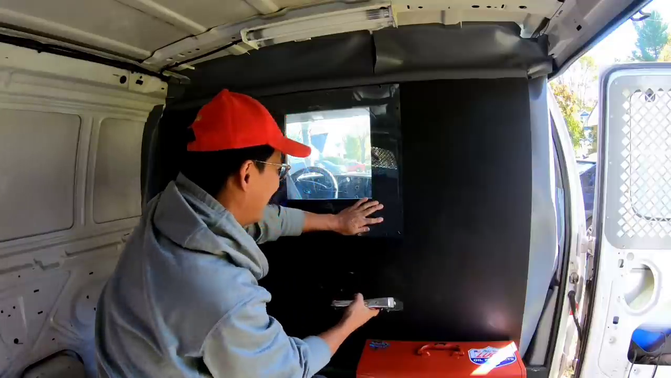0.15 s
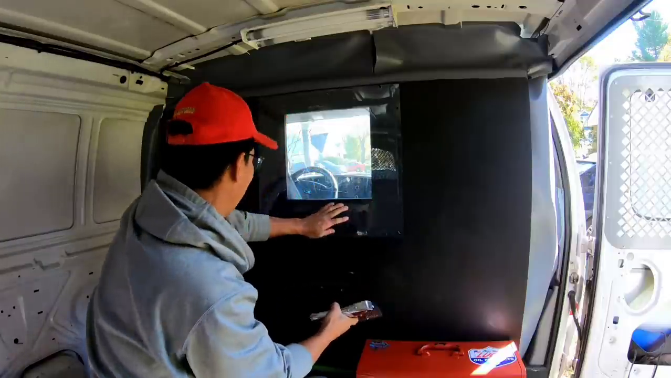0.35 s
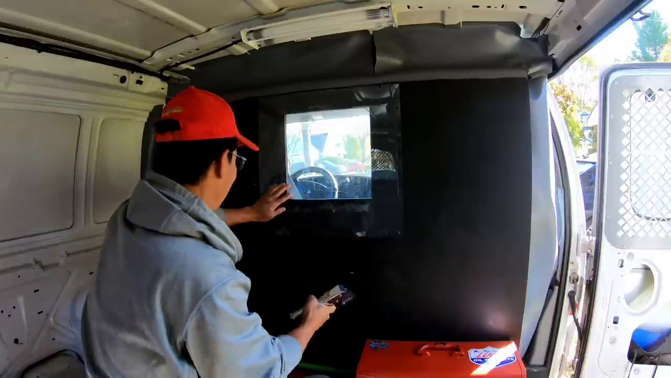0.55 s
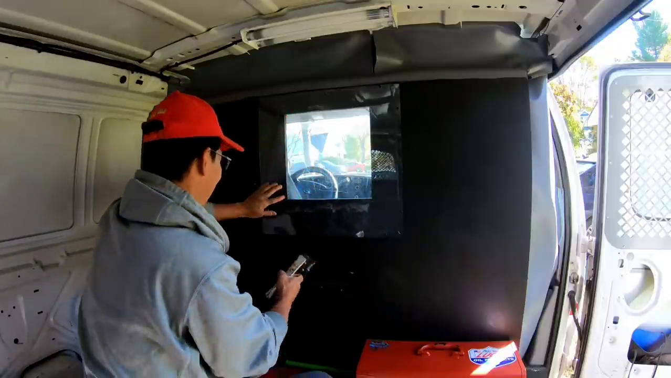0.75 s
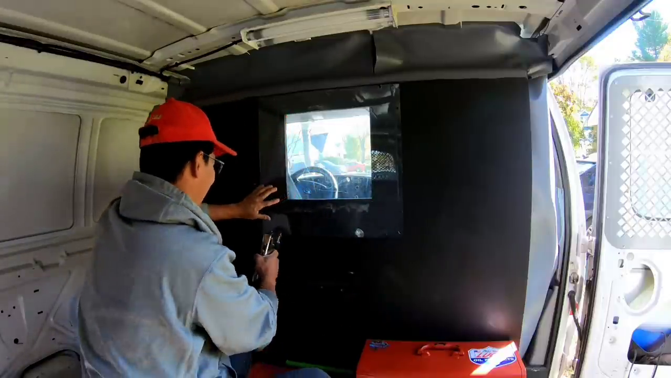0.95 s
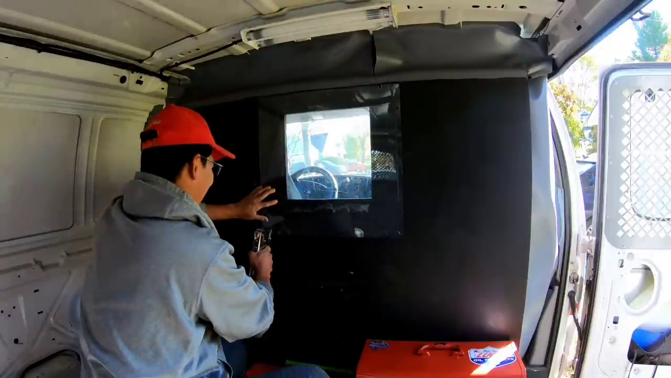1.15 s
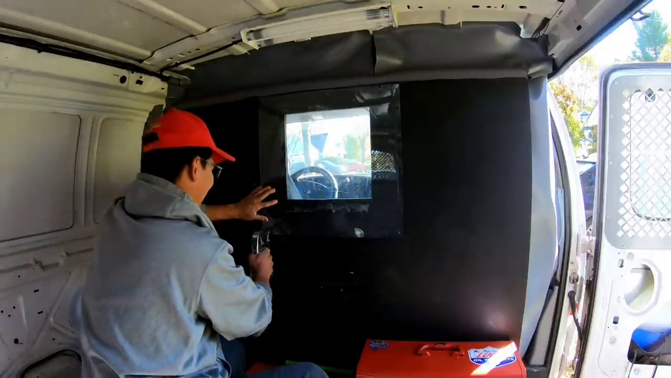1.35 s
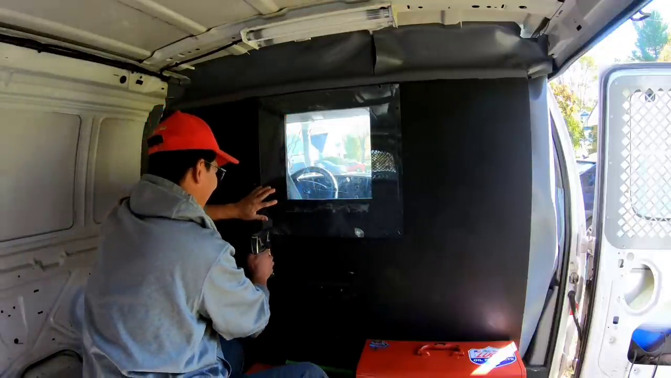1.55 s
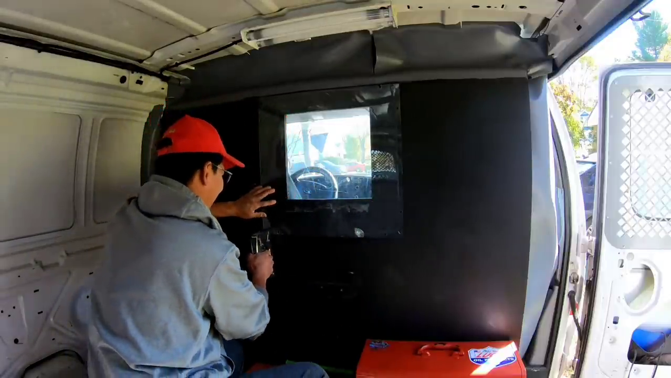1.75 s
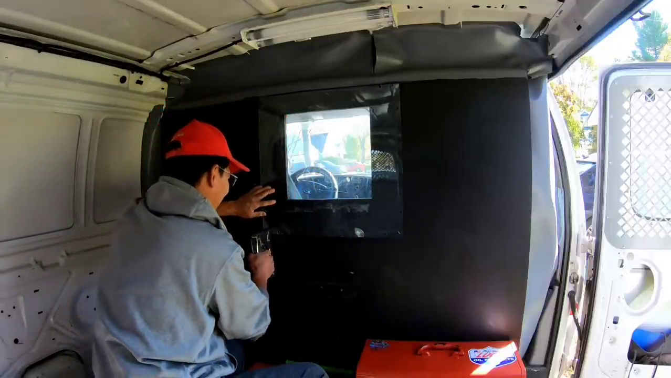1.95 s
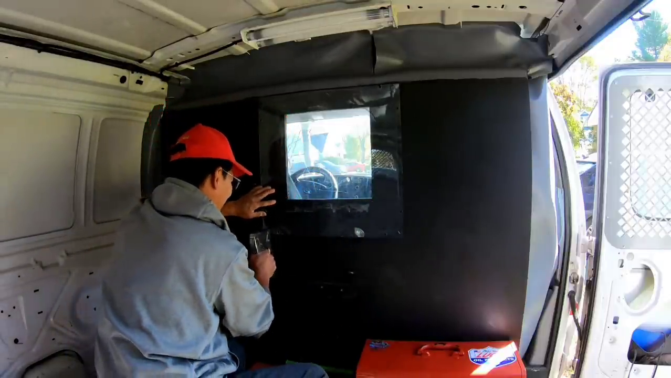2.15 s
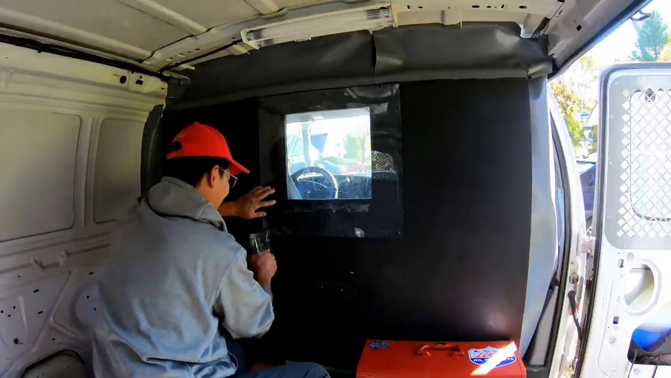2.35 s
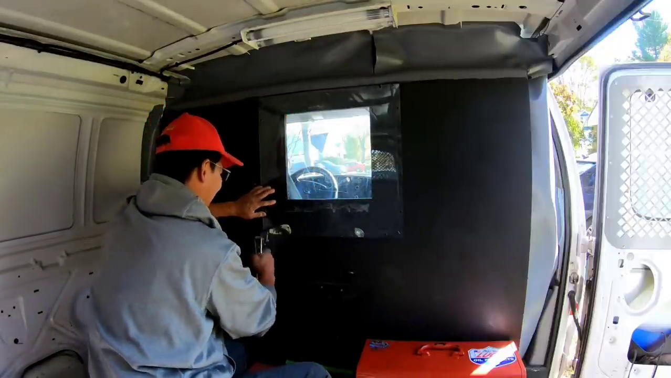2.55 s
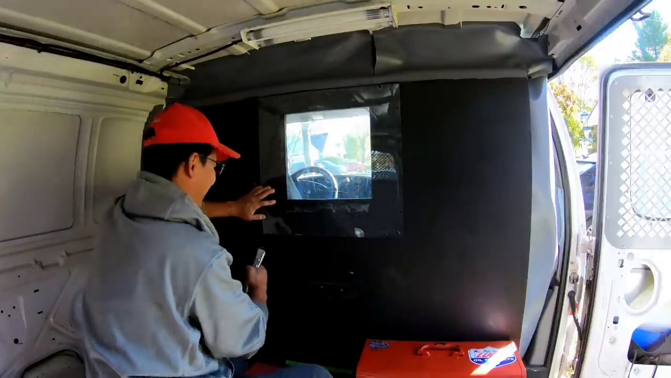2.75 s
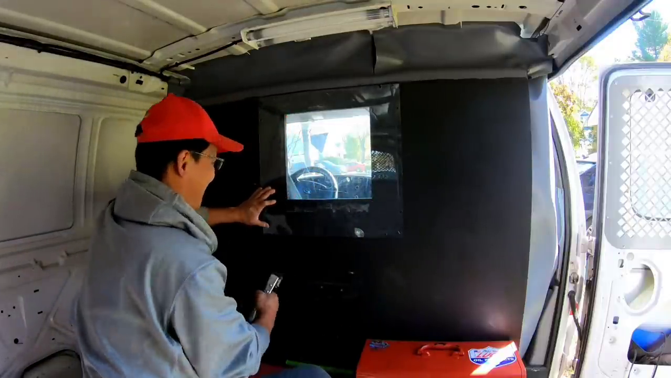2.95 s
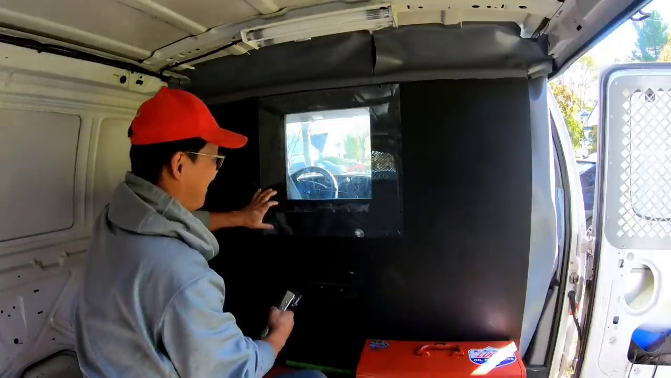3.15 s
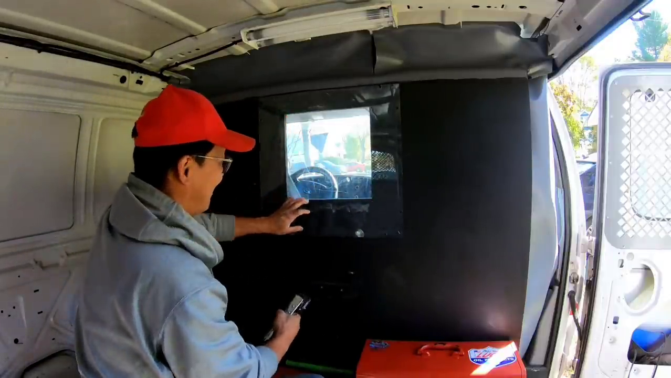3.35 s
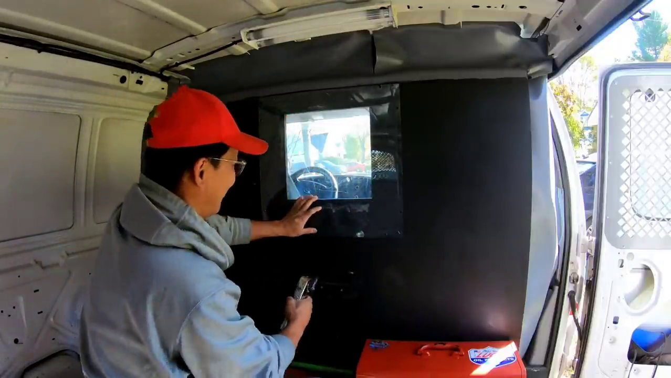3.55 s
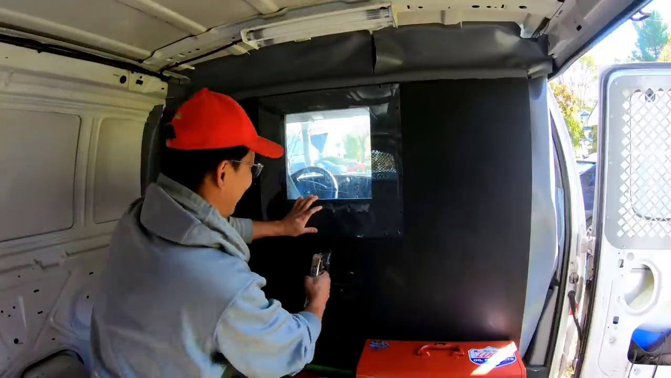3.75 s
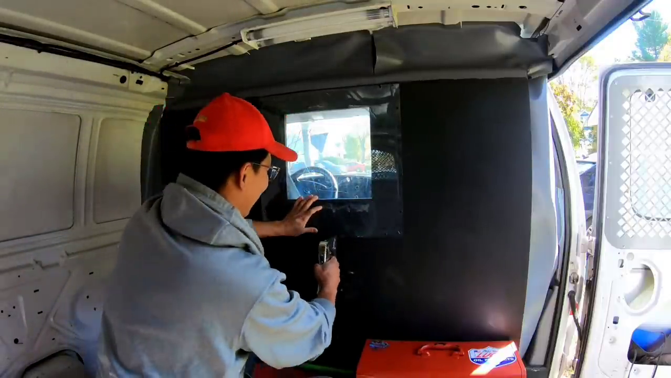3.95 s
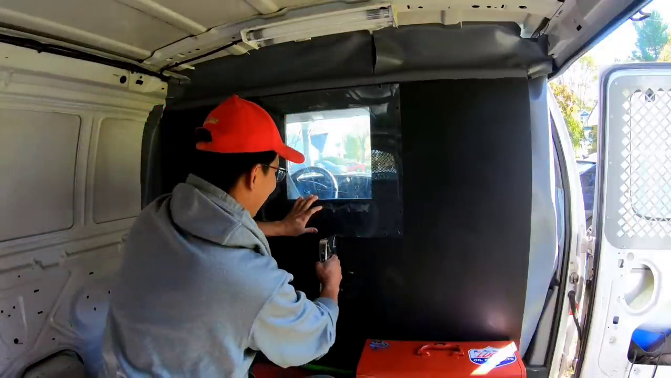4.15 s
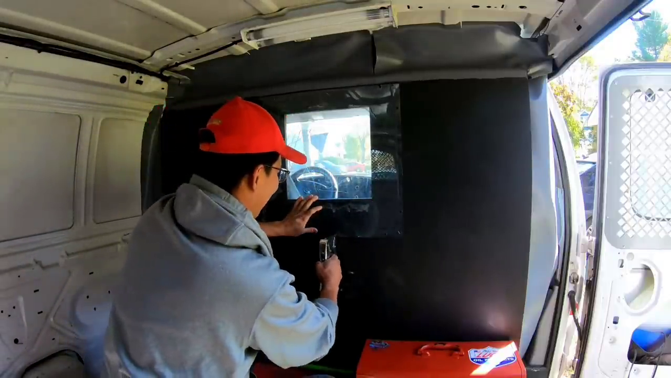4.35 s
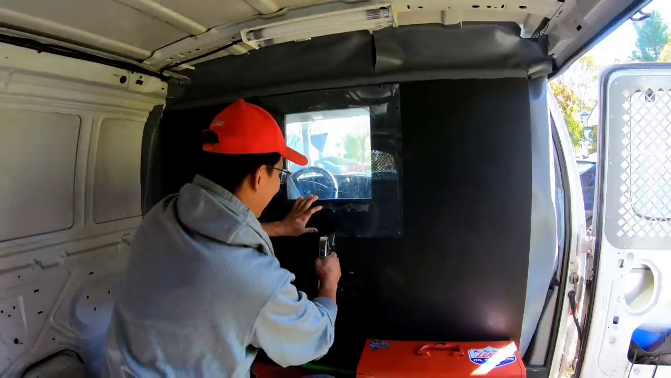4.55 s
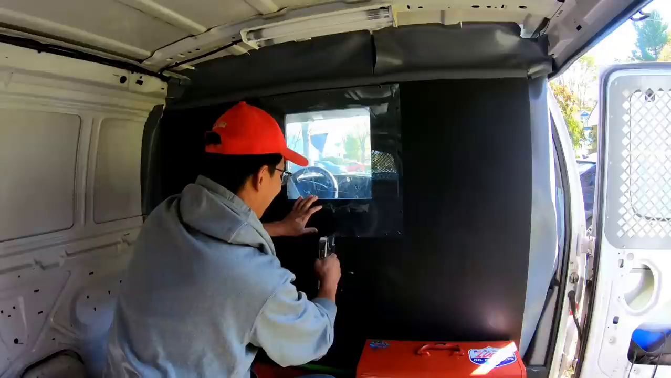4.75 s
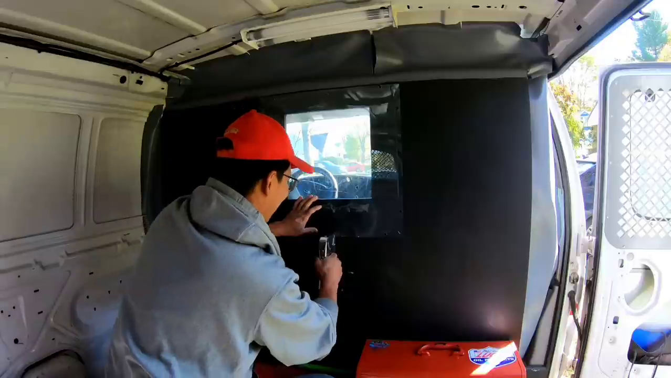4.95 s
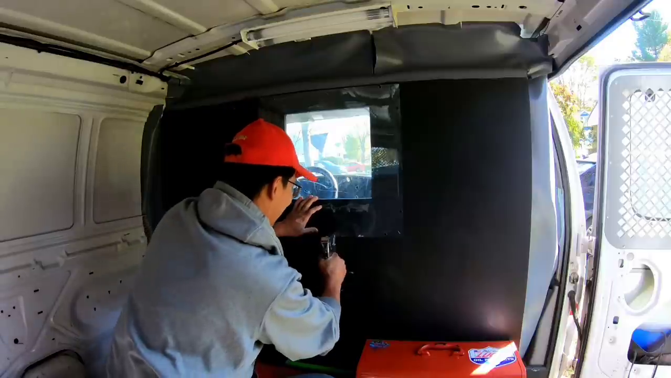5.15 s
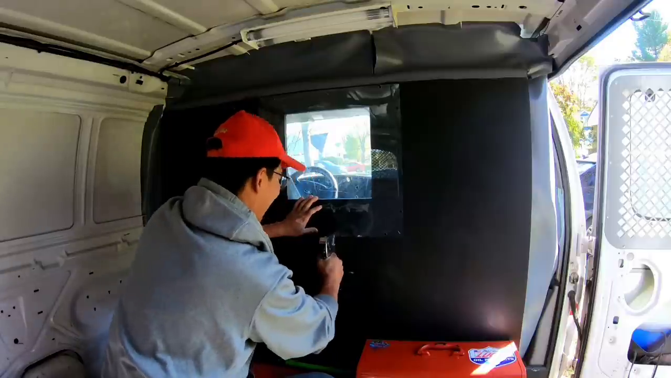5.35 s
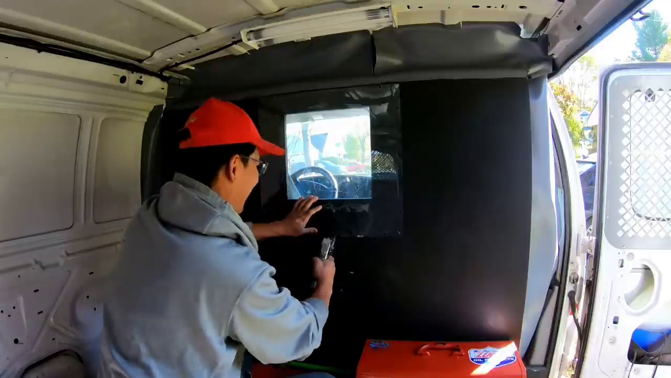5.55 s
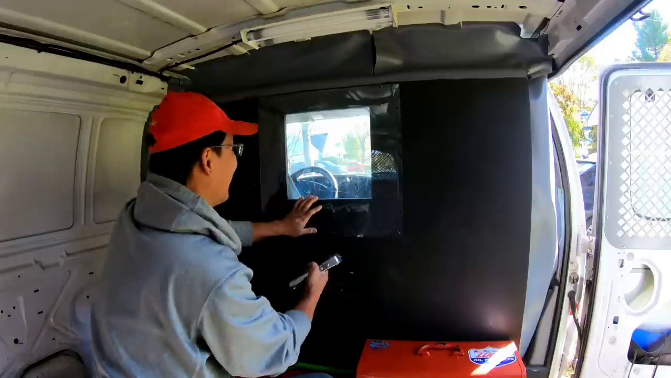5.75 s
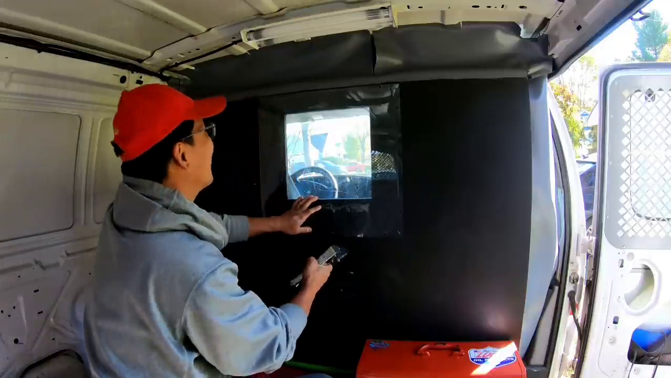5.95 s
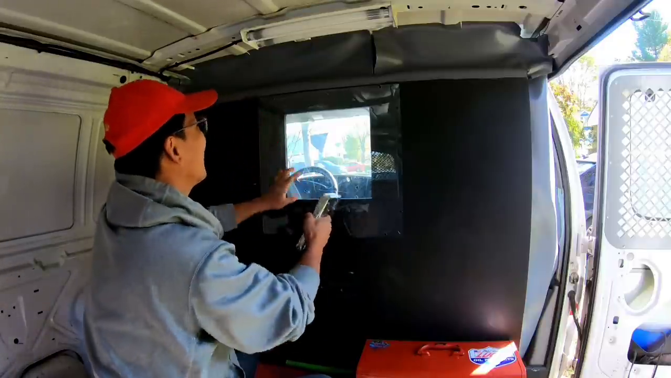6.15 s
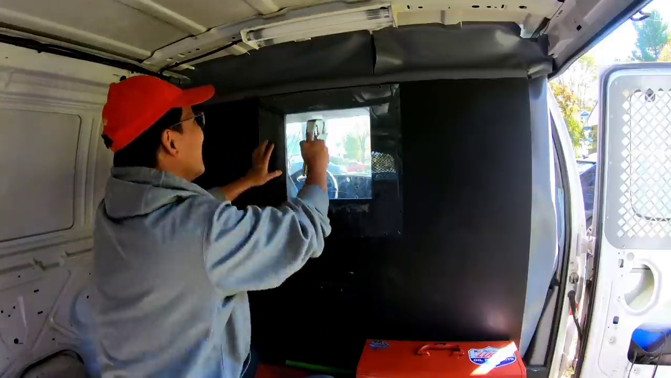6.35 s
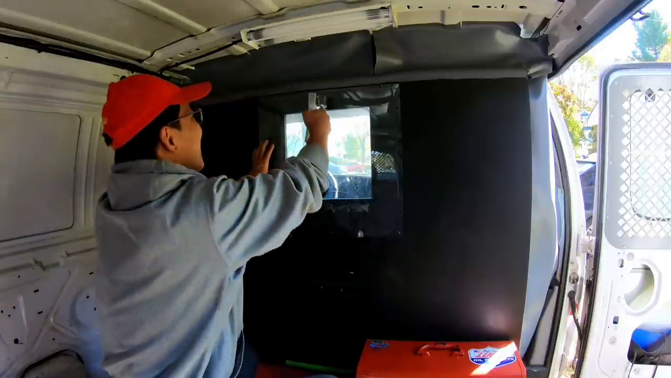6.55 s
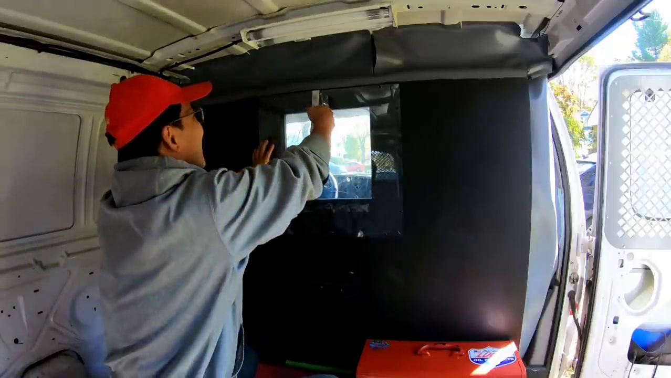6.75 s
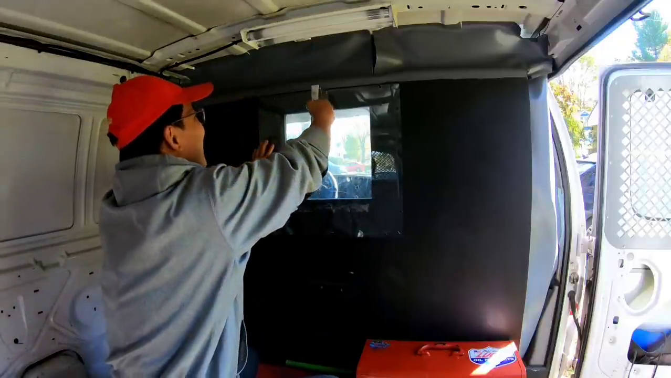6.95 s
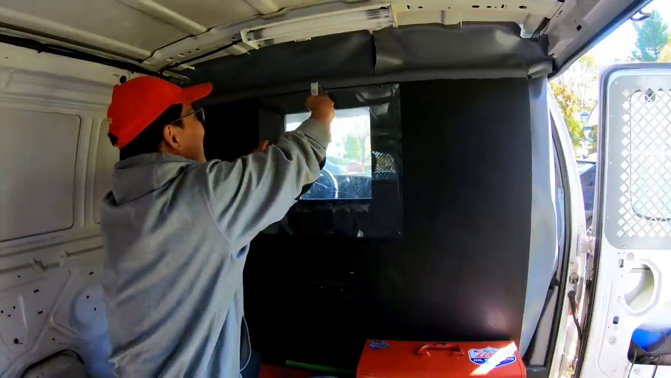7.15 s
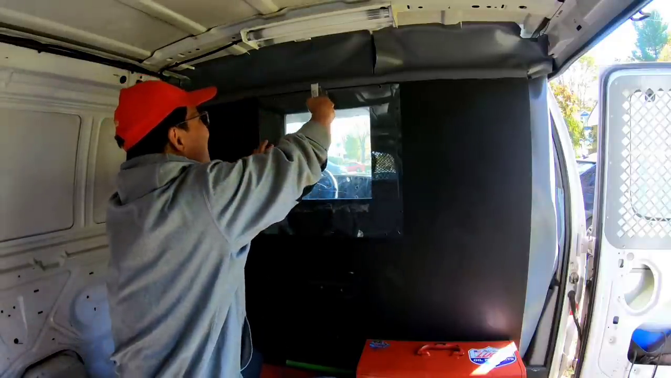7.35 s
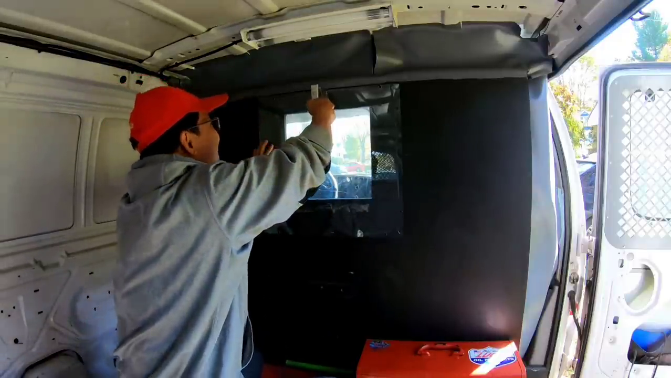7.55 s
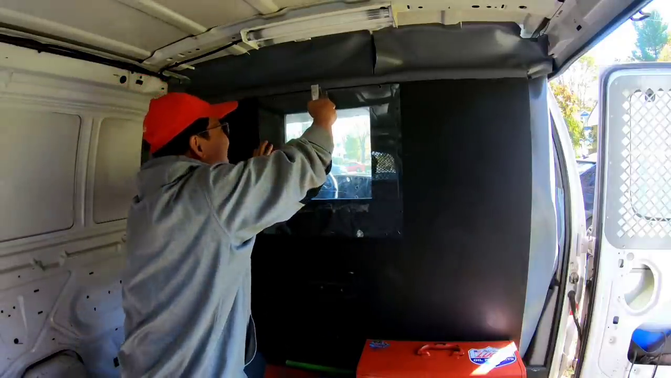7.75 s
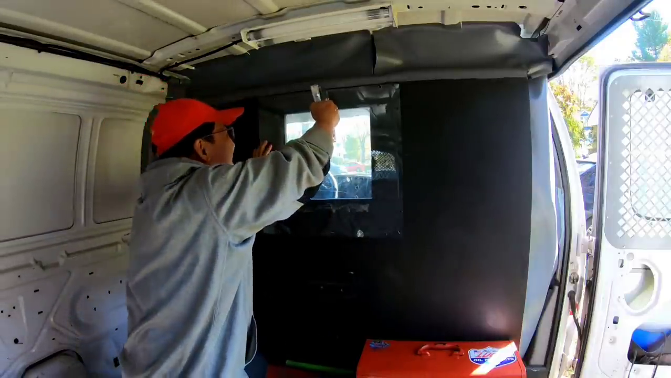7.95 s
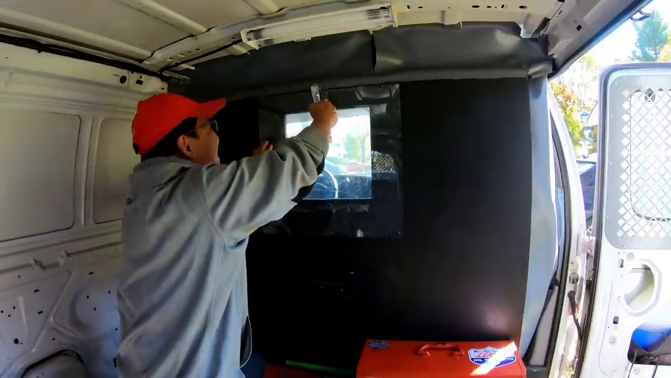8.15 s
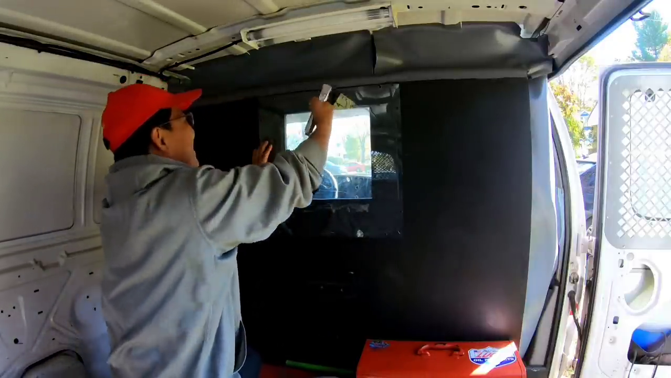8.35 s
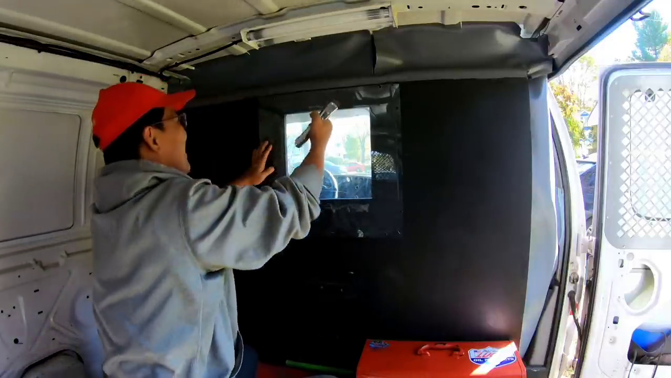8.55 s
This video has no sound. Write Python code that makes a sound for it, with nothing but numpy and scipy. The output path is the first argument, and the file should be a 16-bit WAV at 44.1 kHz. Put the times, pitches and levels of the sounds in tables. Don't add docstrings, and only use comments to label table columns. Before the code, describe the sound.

Inside a metal van, a hand stapler snaps three widely spaced times into a plywood wall, with booming panels, small rattles and low engine hum.

```python
import sys
import numpy as np
from scipy import signal
from scipy.fft import rfft, irfft, next_fast_len
from scipy.io import wavfile
from scipy.ndimage import uniform_filter1d

SR = 44100
rng = np.random.default_rng(int(sys.argv[2]) if len(sys.argv) > 2 else 0)


def magnitude_from_level(level_db):
    exponent = np.asarray(level_db, float) / 20
    return 10 ** exponent


def generate_wav(sig):
    pcm = np.round(np.clip(np.atleast_2d(sig).T, -1, 1) * 32767).astype(np.int16)
    wavfile.write(sys.argv[1], SR, pcm)


N = 383229

# t/s, peak/dB, ring f/Hz, bare crack/dB
SHOTS = [
    (2.2253, -7, 2800, 10),
    (2.2278, -10, 2800, 11),
    (5.2172, -16, 1700, 8),
    (5.2195, -8, 2500, 11),
    (7.9848, -4.5, 2420, 8),
    (7.9865, -13, 4000, 8),
]
# t/s, peak/dB, ring f/Hz, plywood/dB
LATCHES = [
    (2.199, -8.5, 4300, -9),
    (5.1893, -9, 3630, -13),
    (7.939, -11, 3232, -22),
]
# t/s, peak/dB, ring f/Hz, sizzle/dB, plywood/dB
TICKS = [(0.584, -52, 1270, -41, -16.5), (1.3442, -38, 4130, -26, -20.5), (1.466, -39, 3000, -15.5, -21.5),
         (2.6705, -20, 2600, -4.5, -16), (2.825, -41, 1500, -15, -27), (2.9519, -45.5, 1404, -14, -12),
         (3.031, -39.5, 4007, -4.5, -25.5), (3.5621, -43.5, 1660, -37, -12), (5.5579, -35, 4750, -10, -13),
         (5.6238, -42, 2598, -29, -37), (5.7025, -31, 3030, -6.5, -18), (5.7075, -18.5, 1780, -12, -31),
         (5.7207, -25.5, 1763, 0.5, -23.5), (6.8137, -29.5, 2490, -29.5, -14),
         (6.956, -35.5, 2100, -16, -26), (8.4038, -21, 6170, -10.5, -19.5),
         (8.4139, -28, 2300, -9.5, -15.5)]
# t/s, peak/dB, ring f/Hz, sizzle/dB, plywood/dB
KNOCKS = [(1.5545, -26.5, 1550, -33, 1), (1.726, -45.5, 2800, -21, -5), (1.75, -48, 3300, -28, 0),
          (2.4925, -32.5, 2400, -34, -3), (2.6191, -52, 1680, -24.5, 6), (2.6324, -33, 2600, -28, 1),
          (3.5403, -53, 1630, -41, -8.5), (4.077, -37, 1384, -24.5, 3), (4.9273, -38.5, 2370, -24, -8),
          (6.3639, -53, 1795, -28, -5.5), (6.858, -33, 1500, -35, -3), (7.4178, -47.5, 2306, -36.5, -6),
          (8.2713, -44, 1430, -30.5, 1), (8.307, -42, 1755, -26.5, 4.5)]
# start/s, end/s, level/dB, sizzle/dB, plywood/dB
SLIDES = [(2.026, 2.065, -65.5, -6, -7), (2.185, 2.204, -40.5, -17, -8.5), (5.167, 5.191, -44, -10.5, -4),
          (7.932, 7.94, -52, -15, -20), (2.2, 2.223, -31, -7, 4.5), (2.495, 2.523, -52, -11, 4),
          (2.615, 2.672, -42.5, -9, -11), (3.032, 3.055, -63, -12.5, -21.5), (4.076, 4.087, -63, -7, -5),
          (5.191, 5.221, -25, -12, -6), (5.686, 5.701, -47.5, -6, -21.5), (6.826, 6.869, -55.5, -17.5, -19),
          (7.954, 7.985, -30.5, -7.5, 0.5), (8.313, 8.353, -58.5, -13, -13.5),
          (8.38, 8.405, -47, -4, -11.5)]
# f/Hz, width/Hz, level/dB
HOUSING = [(1740, 200, -15), (2830, 400, -14), (3540, 84, -20.5), (4060, 84, -26), (5000, 140, -12.5),
           (6400, 400, -5), (7572, 700, 1), (11200, 700, -3)]
# f/Hz, level/dB, time to fall 60 dB/s
SPRING = [(1165, -52, .4), (1330, -54, .35), (1695, -55, .4), (2185, -54, .4), (2385, -61, .35),
          (2600, -62, .6), (2800, -62, .4), (3300, -60, .45), (4010, -56, .3), (6250, -56, .25)]
# t/s, f/Hz, peak/dB, time to fall 60 dB/s, swell/s
CHIMES = [(1.3445, 4200, -45, .06, .001), (1.3445, 1850, -47, .06, .001), (1.468, 1250, -52, .15, .003),
          (2.2262, 2810, -12, .04, .001), (2.2262, 1650, -15, .05, .001), (2.2262, 3650, -17, .03, .001),
          (2.236, 2645, -25, .15, .004), (2.24, 1190, -27, .25, .01), (2.495, 1693, -39, .1, .002),
          (2.496, 1125, -38, .12, .003), (2.51, 2392, -46, .25, .01), (2.36, 2480, -56, .9, .03),
          (2.671, 3310, -40, .12, .002), (2.672, 11150, -36, .08, .002), (5.708, 11200, -46, .2, .003),
          (5.71, 6100, -42, .06, .002), (2.671, 6817, -43, .1, .001), (2.672, 1265, -43, .2, .003),
          (2.68, 2115, -45, .2, .004), (5.19, 3601, -27, .04, .001), (5.195, 2191, -29, .1, .004),
          (5.19, 4602, -30, .07, .001), (5.219, 2800, -12, .03, .001), (5.219, 1790, -15, .03, .001),
          (5.235, 2600, -35, .3, .01), (5.708, 1324, -43, .22, .01), (5.708, 1760, -42, .15, .003),
          (6.814, 2610, -43, .1, .002), (7.9395, 3146, -25, .1, .001), (7.945, 1983, -34, .15, .004),
          (7.985, 2300, -10, .018, .0004), (7.985, 2980, -13, .018, .0004), (7.995, 1168, -29, .15, .004),
          (7.995, 3523, -32, .15, .003), (8.05, 2487, -40, .25, .01), (8.405, 2357, -41, .2, .006),
          (8.405, 6204, -42, .12, .002), (8.405, 1500, -46, .2, .004)]
# t/s, f/Hz, peak/dB, time to fall 60 dB/s, swell/s
BOARDS = [(2.2, 800, -26, .06, .002), (2.24, 851, -30, .28, .01), (2.505, 192, -21, .3, .015),
          (2.515, 815, -42, .2, .005), (2.672, 500, -38, .1, .003), (5.19, 190, -28, .2, .01),
          (5.222, 862, -23, .3, .012), (5.24, 120, -17, .45, .03), (5.23, 300, -26, .2, .015),
          (6.818, 240, -36, .2, .01), (6.82, 480, -42, .15, .006), (7.992, 205, -12, .14, .004),
          (7.99, 520, -20, .15, .004), (6.855, 600, -36, .15, .004), (4.078, 700, -42, .15, .003),
          (7.985, 330, -18, .08, .002), (7.985, 130, -30, .15, .004), (8.1, 427, -34, .5, .03),
          (8.3, 480, -44, .3, .02), (8.3, 340, -38, .5, .03), (1.557, 620, -30, .1, .002),
          (1.557, 474, -30, .12, .003), (1.76, 250, -36, .2, .006)]
# f/Hz, time to fall 60 dB/s
CABIN_T60 = [(300, 0.2), (800, .27), (2000, .22), (5000, .25), (10000, .26), (13000, 0.225), (16000, .15)]
# t/s, peak/dB, panel f/Hz, sway/dB, ring share (times the panel's own ring)
THUDS = [(0.689, -37.5, 123, -8.5, 0.355), (0.803, -43, 105, -2, 1), (1.379, -37, 119.7, -2.5, 0.71),
         (1.432, -28, 115, 14, 0.47), (1.556, -17, 131.4, -12, 0.4), (1.615, -32, 127.2, -24, 0.65),
         (1.752, -25, 174.2, -19, 0.45), (2.229, -8, 93.1, -9, 0.445), (2.495, -29, 98, -2, 0.45),
         (2.626, -23.5, 260, -22, 0.33), (3.543, -33.5, 74, -10.5, 0.86), (4.076, -20.5, 116.4, -24, 0.627),
         (4.926, -29, 113.7, -4.5, 0.66), (5.217, -8.5, 183, -7.5, 0.766), (5.479, -31, 34.9, 3, 1.13),
         (5.499, -44, 121, -5, 0.41), (6.845, -14.5, 100, -3, 0.55), (6.887, -35, 121, -1.14, 0.56),
         (6.954, -33, 123, -6.5, 1.33), (7.428, -24, 100, -16, 0.5), (7.984, -8.5, 190, -21, 0.6),
         (8.27, -29, 100.7, -16, 0.5), (8.338, -35, 200, -22, 0.6)]
# t/s, peak/dB, panel f/Hz, ring share
PANEL_RINGS = [(1.557, -24.5, 300, 0.37), (2.227, -25, 491.6, 0.8), (2.226, -24.5, 690, 0.71),
               (2.509, -13.5, 192.6, 0.39), (2.522, -15, 190, 0.333), (5.22, -27, 407.4, 0.65),
               (6.85, -24, 192.4, 0.65), (7.432, -36, 400, 0.47), (7.985, -16, 436.6, 1.14),
               (8.02, -21, 369.6, 1.23), (5.33, -34, 300, 1.05), (7.991, -24.5, 75, 0.46),
               (8.0, -23, 260, 1.16)]
# f/Hz, level/dB, time to fall 60 dB/s
PANELS = [(32.3, 0, 0.41), (46.3, -16, 1), (71.8, -11.5, 0.54), (73.8, 4, 0.38), (104.56, -5.5, 0.97),
          (124.6, -2, 0.72), (135.1, 0.5, 0.42), (152.22, -1.5, 0.54), (183, -4, 0.52), (219.55, -10, .5),
          (254.28, -4.5, .4), (300, -10, .4), (347.8, -14, 0.41), (415.5, -13.5, 0.49), (469.1, -9.5, 0.29),
          (521, -12.5, 0.12), (604, -14.5, 0.15), (690, -14.5, 0.095), (840, -23.5, 0.084)]
# middle t/s, length/s, f/Hz, width/Hz, level/dB
SQUEAKS = [(0.594, 0.023, 1210, 150, -62.5), (3.538, 0.0219, 3630, 139, -70),
           (3.682, 0.056, 4020, 300, -64.5), (3.896, 0.051, 5040, 150, -77.5), (4.51, 0.09, 900, 2600, -50),
           (3.572, 0.043, 1700, 290, -65), (0.3026, 0.0583, 4460, 9400, -64.5),
           (0.454, 0.0434, 6200, 9000, -68), (5.118, 0.046, 4070, 410, -61.5),
           (5.92, 0.112, 4410, 2600, -62), (6.255, 0.11, 5000, 900, -63),
           (7.319, 0.065, 332.4, 16.3, -59.5), (5.145, 0.037, 430, 110, -51), (5.11, 0.044, 771, 450, -54),
           (1.775, .04, 647, 250, -54), (2.13, .1, 650, 200, -57), (6.26, .08, 3700, 500, -66),
           (6.255, .06, 2900, 400, -64), (6.25, .1, 7600, 2000, -66), (3.69, .09, 7600, 1800, -70),
           (7.45, .04, 600, 600, -48), (7.455, .03, 1350, 300, -58), (2.53, .045, 1900, 2200, -45),
           (6.875, .03, 1200, 1800, -48), (6.83, .02, 2000, 1500, -50), (2.645, .03, 2500, 3000, -48),
           (2.59, .02, 1500, 2000, -56)]
# t/s, fade/s, level/dB
BRUSHES = [(.25, 0.102, -78), (.7, .06, -72), (.92, 0.15, -66), (1.1, .06, -69), (4.5, .04, -66),
           (5.51, .04, -68), (1.52, 0.054, -61.5), (1.77, 0.044, -66.5), (2.54, .04, -69),
           (2.71, .04, -68.5), (3.05, .05, -59.5), (3.73, .12, -69.5), (4.09, 0.053, -64.5),
           (5.15, .12, -68), (5.575, .04, -59), (6.39, 0.146, -64.5), (6.99, .03, -61), (7.24, .1, -74),
           (7.85, 0.098, -74), (8.33, 0.09, -61)]
# f/Hz, level per Hz/dB
CLOTH_COLOUR = [(1000, -20), (2500, 4.5), (5000, 2.5), (8000, -3.5), (11000, -10), (14000, -29)]
# t/s, level/dB
ENGINE = [(0, -50), (.25, -56.5), (.85, -47), (2.1, -44), (2.95, -55.5), (3.95, -50), (4.4, -47),
          (5.1, -48), (5.7, -55), (6.0, -53), (6.5, -46.5), (7.9, -47.5), (8.45, -54), (8.69, -48)]
# f/Hz, width/Hz, level/dB
DRONE = [(50.5, 6.1, -9.5), (75, 11, -2), (121, 20, 1.02), (162, 24, -11.5), (215.6, 25, -10)]
# t/s, level/dB
STREET = [(0, -66.5), (.43, -60.5), (.8, -56.5), (1.2, -59), (2.05, -55), (2.78, -64), (3.1, -62.5),
          (3.73, -57), (4.3, -56), (4.53, -54), (5.0, -56.5), (5.95, -59.5), (6.3, -54), (6.7, -55.5),
          (7.3, -56.5), (7.82, -54), (8.5, -64.5), (8.69, -56)]
# f/Hz, level per Hz/dB
HISS = [(150, -45), (250, -6.5), (458, -5), (621, -7.5), (760, -2.5), (1160, -6.5), (1260, -5),
        (1470, -4.5), (2310, -11), (2690, -10.5), (3460, -16.5), (4930, -21), (14000, -42.5)]
# f/Hz, correlation (0 to 1)
LIKENESS = [(40, .997), (100, .995), (200, .985), (350, .94), (700, .68), (1400, .35), (2800, .65),
            (5600, .45), (10000, .3)]
# f/Hz, left minus right/dB
LEFT_DB = [(100, .4), (700, .1), (1400, 1.5), (3000, .8), (9000, 0), (13000, .9)]
# f/Hz, left leads by/radians
LEAD = [(3000, 0), (5000, 0.6), (8000, 1.4), (13000, 1.6)]


def read(table, hz):
    f, v = np.transpose(table)
    return np.interp(np.log(np.maximum(hz, 1)), np.log(f), v)


def unit(x):
    return x / np.sqrt(np.mean(x ** 2))


def shaped(x, gain):
    n = next_fast_len(x.shape[-1])
    spectrum = rfft(x, n) * gain(np.arange(n // 2 + 1) * SR / n)
    return irfft(spectrum, n)[..., :x.shape[-1]]


def hump(hz, centre_hz, width_hz):
    return 1 / np.sqrt(1 + (2 * (hz - centre_hz) / width_hz) ** 2)


def likeness(hz):
    return np.clip(read(LIKENESS, hz), 0, 1)


def pair(n):
    mid, side = rng.standard_normal((2, n))
    mid = shaped(mid, lambda hz: np.sqrt((1 + likeness(hz)) / 2))
    side = shaped(side, lambda hz: np.sqrt((1 - likeness(hz)) / 2))
    return np.array([mid + side, mid - side])


def walk(rate_hz):
    k = int(SR / rate_hz)
    steps = np.repeat(rng.standard_normal(N // k + 1), k)
    return 1.3 * uniform_filter1d(uniform_filter1d(steps, k), k)[:N]


def add(out, x, s):
    i = int(s * SR)
    out[..., i:i + x.shape[-1]] += x[..., :N - i]


def contacts():
    ticks = [row + (2.5,) for row in TICKS]
    knocks = [row + (4,) for row in KNOCKS]
    latches = [(s, db, hz, -14, wood_db, -1.42) for s, db, hz, wood_db in LATCHES]
    shots = [(s, db, hz, -12, -8, crack_db) for s, db, hz, crack_db in SHOTS]
    return ticks + knocks + latches + shots


def steel_colour(ring_hz, sizzle_db, wood_db, blow_db):
    tilt = [(150, wood_db - 11), (450, wood_db + 7.0), (850, wood_db + 6.5), (1250, 1),
            (4500, 0.26 * sizzle_db + 3.5), (8000, sizzle_db + 10.5), (12000, sizzle_db + 8.5),
            (13500, sizzle_db + 0.5), (15500, blow_db - 7)]

    def gain(hz):
        housing = 0.92 * sum(magnitude_from_level(db) * hump(hz, f, width) for f, width, db in HOUSING)
        ring = 1.9 * hump(hz, ring_hz, .15 * ring_hz) ** 2
        return magnitude_from_level(read(tilt, hz)) * (1 + housing + ring)
    return gain


def causal(gain, size):
    c = irfft(np.log(gain(np.arange(size // 2 + 1) * SR / size)), size)
    c[1:size // 2] *= 2
    c[size // 2 + 1:] = 0
    return np.exp(rfft(c))


def stapler():
    size, wait = 8192, .01
    energy_db = 13
    direct, fed = np.zeros(N), np.zeros((2, N))
    t = np.maximum(np.arange(size) / SR - wait, 0)
    click = 1. * (np.arange(size) == int(wait * SR))

    def knocks():
        uneven_db = 1.6 * rng.standard_exponential(size // 32).repeat(32)
        return rng.standard_normal(size) * magnitude_from_level(uneven_db)

    def energy(x):
        return np.sqrt(np.sum(shaped(x, lambda hz: hz > 1500) ** 2))

    crack_and_rattle = (t / .0008) * (np.exp(-t / 0.0012) + 0.045 * np.exp(-t / 0.0058))
    for k, (s, db, ring_hz, sizzle_db, wood_db, crack_db) in enumerate(contacts()):
        response = causal(steel_colour(ring_hz, sizzle_db, min(wood_db, 4), db), size)
        burst = shaped(knocks() * crack_and_rattle, lambda hz: response)
        push = shaped(click, lambda hz: response)
        dulled = shaped(burst, lambda hz: hump(hz, 0, 15000) ** 2)
        add(direct, dulled * magnitude_from_level(db + energy_db + crack_db) / energy(burst), s - wait)
        add(fed[k % len(fed)], push * magnitude_from_level(db + energy_db) / energy(push), s - wait)

    for start, end, db, sizzle_db, wood_db in SLIDES:
        growth = (t / (end - start)) ** 2.7 * (t < end - start)
        slide = unit(shaped(knocks() * growth, steel_colour(3000, sizzle_db, wood_db, db + 12)))
        add(direct, slide * magnitude_from_level(db - 5.5), start - wait)
        add(fed[0], slide * magnitude_from_level(db - 10.0), start - wait)
    return direct, fed


def spring(size):
    t = np.arange(size) / SR
    hz, db, t60 = np.transpose(SPRING)[:, :, None, None]
    split = 1 + 0.0097 * rng.standard_normal((2, len(SPRING), 2, 1))
    return (magnitude_from_level(db - 60 * t / t60) * np.sin(2 * np.pi * hz * split * t)).sum(axis=(0, 1))


def cabin(direct, fed):
    size = 16384
    t = np.arange(size) / SR
    field = np.array([pair(size) for _ in fed])
    echoes = 0
    for hz in 200 * 2 ** np.arange(0, 6.6, .5):
        band = shaped(field, lambda f: np.exp(-(np.log2(np.maximum(f, 1) / hz) / .3) ** 2))
        band = band / band[..., :2048].std(axis=2, keepdims=True)
        near = magnitude_from_level(-60 * t / read(CABIN_T60, hz))
        far_end = magnitude_from_level(-29 - 60 * t / .45) * (2500 < hz < 10000)
        echoes = echoes + band * (near + far_end)
    build_up = np.clip(t / 0.0044, 0, 1)
    echoes = echoes * build_up * magnitude_from_level(-38.5) + spring(size)
    wall = np.array([np.roll(direct, int(s * SR)) for s in (.0013, .0021)]) * magnitude_from_level(-6)
    answered = signal.oaconvolve(fed[:, None], echoes, axes=2).sum(0)[:, :N]
    return magnitude_from_level(-1.09) * (direct + wall) + answered


def chimes():
    out = np.zeros((2, N))
    for s, hz, db, t60, swell_s in CHIMES + BOARDS:
        t = np.arange(int(SR * np.clip(t60 + 4 * swell_s, .02, 1))) / SR
        a, b = rng.standard_normal(2)
        apart = np.arccos(likeness(hz)) * np.array([[.3], [-.3]])
        waver = 1 + .25 * np.sin(2 * np.pi * 25 * magnitude_from_level(3 * a) * t + 3 * b)
        swell = 1 - np.exp(-t / max(swell_s, 1e-4))
        fade = magnitude_from_level(db - 60 * t / max(t60, .01))
        add(out, fade * swell * waver * np.sin(2 * np.pi * hz * t + apart), s)
    return out


def blows():
    thuds = [(s, db, hz, sway_db, 10.5, share) for s, db, hz, sway_db, share in THUDS]
    rings = [(s, db, hz, -60, 21.5, share) for s, db, hz, share in PANEL_RINGS]
    return thuds + rings


def van_body():
    coarse = 8
    out = np.zeros((2, N))
    hz, db, t60 = np.transpose(PANELS)[:, :, None]
    for s, peak_db, panel_hz, sway_db, focus_db, share in blows():
        t = np.arange(0, int(SR * np.clip(.8 * share, .3, 1)), coarse) / SR
        chance = rng.standard_normal((3, len(PANELS), 1))
        focus = 1 + magnitude_from_level(focus_db) * hump(hz, panel_hz, 0.1 * panel_hz) ** 2
        gain = magnitude_from_level(db + 3.2 * chance[0]) * focus
        gain[0] = magnitude_from_level(sway_db + 22.5)
        turn = 2 * np.pi * hz * (1 + .015 * chance[1]) * t + 3 * chance[2]
        swell = 1 - np.exp(-t / (0.81 / hz))
        fade = swell * magnitude_from_level(-60 * t / (t60 * np.clip(share, .2, 2)))
        apart = np.sqrt((1 - likeness(hz)) / 2) * chance[2]
        mid = (gain * fade * np.sin(turn)).sum(0)
        side = (gain * apart * fade * np.cos(turn)).sum(0)
        boom = signal.resample_poly([mid + side, mid - side], coarse, 1, axis=1)
        add(out, magnitude_from_level(peak_db) / np.abs(mid).max() * boom, s)
    return out


def squeaks():
    insect = unit(shaped(pair(N), lambda hz: hump(hz, 5485, 70) ** 2))
    out = magnitude_from_level(-84.5 + 2.1 * walk(12)) * insect
    for s, length, centre_hz, width_hz, db in SQUEAKS:
        swell = np.hanning(int(2 * length * SR))
        squeak = unit(shaped(pair(len(swell)), lambda hz: hump(hz, centre_hz, width_hz) ** 2))
        add(out, magnitude_from_level(db) * swell * squeak, s - length)
    return out


def follow(source, over_db, shudder_db, db_per_blow_db, swell_s):
    t = np.arange(N) / SR
    gain = magnitude_from_level(over_db + np.interp(t, *np.transpose(source)))
    after = t[:SR] / swell_s
    shudder = after ** 2 * np.exp(2 - 2 * after)
    for s, db, *_ in THUDS:
        add(gain, magnitude_from_level(shudder_db + db_per_blow_db * db) * shudder, s)
    return gain


def engine_drone():
    sway = unit(shaped(pair(N), lambda hz: hump(hz, 41, 22) ** 2 * (hz > 12)))
    hum = unit(shaped(pair(N), lambda hz: sum(magnitude_from_level(db) * hump(hz, f, w) ** 2 for f, w, db in DRONE)))
    sway = follow(ENGINE, -3.5, -24, 1.56, 0.18) * sway
    return sway + follow(ENGINE, -0.84, -10, 1.5, 0.0762) * magnitude_from_level(1.2 * walk(7.9)) * hum


def rustling_cloth():
    t = np.arange(N) / SR
    bursts_db = 2.0 * rng.standard_exponential(N // 64 + 1).repeat(64)[:N]
    grains = magnitude_from_level(bursts_db + 2.1 * walk(17))
    rustle = unit(shaped(pair(N) * grains, lambda hz: magnitude_from_level(read(CLOTH_COLOUR, hz))))
    brushes = sum(magnitude_from_level(db + 1.5) * np.exp(-np.abs(t - s) / fade_s) for s, fade_s, db in BRUSHES)
    return (follow(STREET, -27, -39, 2, 0.0054) + brushes) * rustle


def street_air():
    air = shaped(pair(N), lambda hz: magnitude_from_level(read(HISS, hz) - 2.4 * (hz > 8600)) * (hz > 200))
    hiss = 0
    for hz in 250 * 2. ** np.arange(7):
        band = shaped(air, lambda f: np.clip(1 - np.abs(np.log2(np.maximum(f, 1) / hz)), 0, 1))
        hiss = hiss + magnitude_from_level(1.2 * walk(14)) * band
    lining = magnitude_from_level(2.0 * walk(30)) * unit(shaped(air, lambda hz: hump(hz, 403, 300) ** 2))
    hiss = follow(STREET, -0.96, -17, 2.5, 0.0562) * magnitude_from_level(-1.5) * unit(hiss)
    return hiss + follow(STREET, -31, -16.5, 3, 0.1056) * lining


def scene():
    tool = cabin(*stapler()) + chimes()
    return tool + van_body() + squeaks() + rustling_cloth() + engine_drone() + street_air()


def roll_off(x):
    return signal.sosfilt(signal.butter(12, 16450, fs=SR, output="sos"), x)


def record(dry):
    lean = np.array([[.5], [-.5]])

    def microphones(hz):
        return magnitude_from_level(lean * read(LEFT_DB, hz)) * np.exp(1j * lean * read(LEAD, hz))

    padded = np.pad(dry, ((0, 0), (0, next_fast_len(N) - N)))
    heard = shaped(padded, microphones)[:, :N]
    overloaded = np.tanh(.85 * heard) / .85
    top_cut = signal.cheby2(8, 50, 16800, fs=SR, output="sos")
    mix = signal.sosfilt(top_cut, overloaded)
    return roll_off(mix)


dry = scene()
out = record(dry)
generate_wav(out)
```